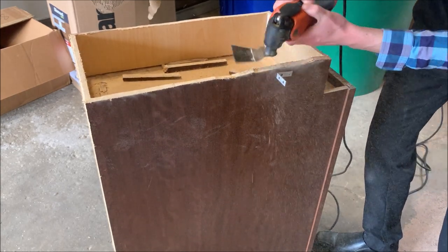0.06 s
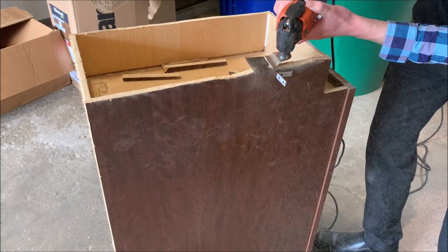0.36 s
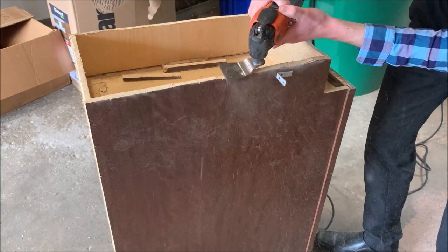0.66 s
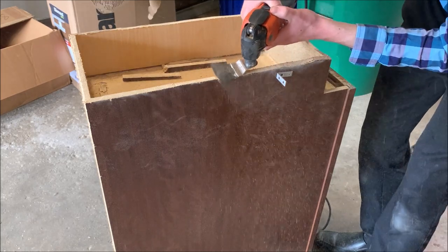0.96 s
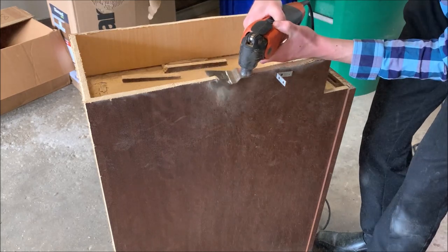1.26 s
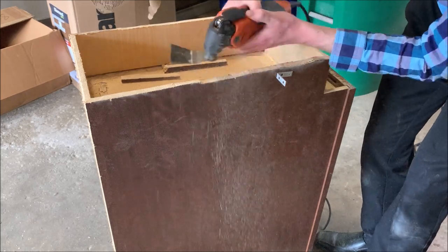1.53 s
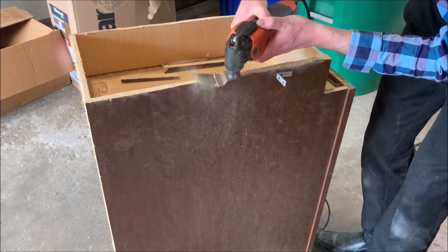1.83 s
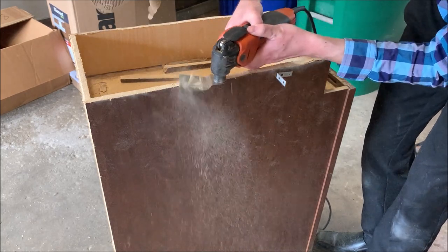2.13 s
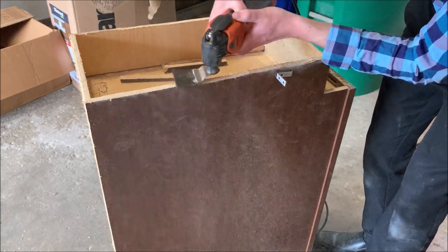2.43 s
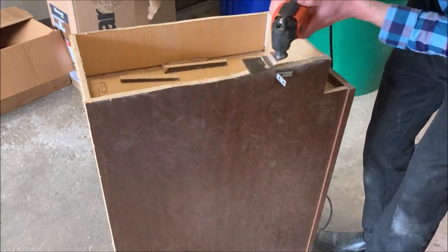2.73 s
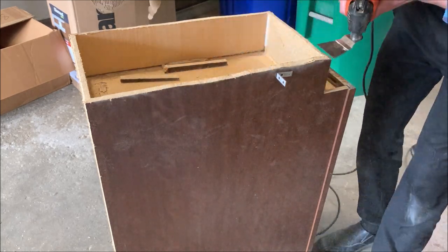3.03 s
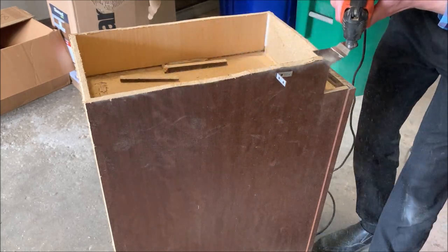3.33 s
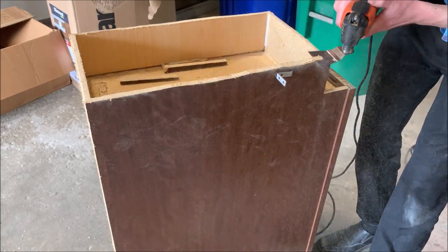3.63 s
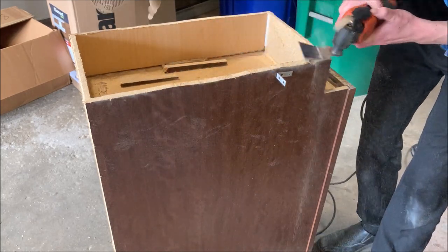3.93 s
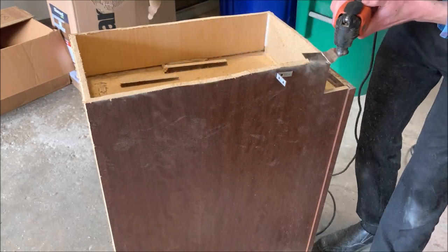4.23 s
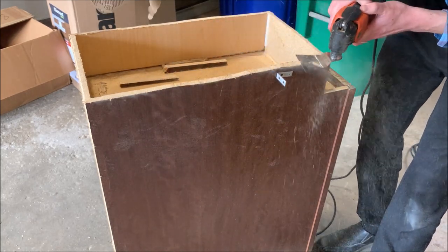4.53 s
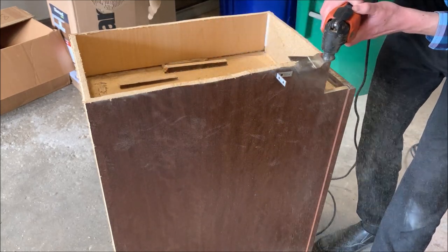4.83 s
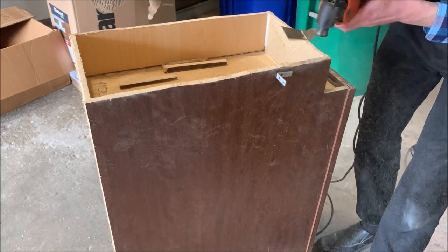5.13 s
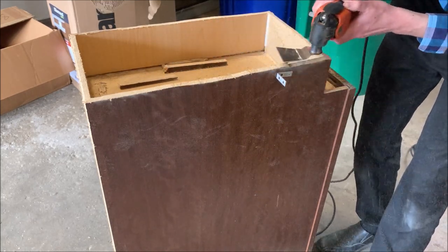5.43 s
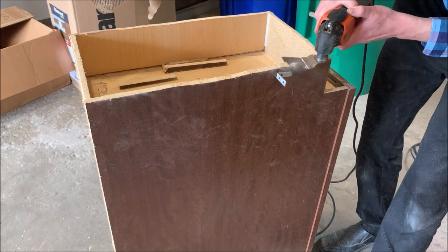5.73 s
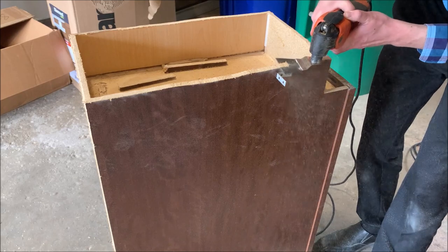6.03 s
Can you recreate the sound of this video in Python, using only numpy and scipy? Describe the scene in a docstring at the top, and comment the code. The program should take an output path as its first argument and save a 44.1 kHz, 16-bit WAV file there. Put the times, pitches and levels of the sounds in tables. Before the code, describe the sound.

An oscillating multi-tool cuts a wooden cabinet edge in short passes, its high whine swelling with a gritty rasp and chatter at each bite.

```python
"""An oscillating multi-tool trims the edge of a wooden cabinet in a garage, in short passes.
It opens in mid-cut, then lifts and whines thinly. At each new bite the motor sags until its governor
catches up, the whine grows loud, the teeth rasp in time with the strokes and the panel drones.
From about 1 s, hard pressure brings bouts of chatter an octave below the whine, and a faint tone sinks
in the background. Two brief touches follow, then mostly longer passes; the last runs on to the end."""
import sys
import numpy as np
from scipy import signal
from scipy.fft import rfft, irfft, next_fast_len
from scipy.io import wavfile

SR = 44100
rng = np.random.default_rng(int(sys.argv[2]) if len(sys.argv) > 2 else 0)


def int16_out(signal):
    """Quantize to a 16-bit WAV file."""
    q = np.round(np.clip(np.atleast_2d(signal).T, -1, 1) * 32767)
    wavfile.write(sys.argv[1], SR, q.astype(np.int16))


N = 272097
TIME = np.arange(N) / SR
TICK_S = .001
TICKS = np.arange(-.5, 6.3, TICK_S)  # clock of the hand's movements, t/s

# Contacts of blade and wood: bite t/s, lift t/s, time to press home t/s, ungoverned drag at bite f/Hz
# and at lift f/Hz, first-touch offset/dB, relative level/dB of hiss, rasp, drone and whine,
# swell of the whine/dB, level/dB of harmonics 2, 3, 4, 5 and 7
PASSES = [(-.5, .08, 0.046, 100.5, 126.5, -8, -29.5, -35, -47, -25.5, -2.5, -28.5, -49, -57, -27, -39),
          (.275, .52, .13, 35.5, 101.5, -7, -30, -42.5, -49.5, -29, 4.5, -35, -41, -39, -33, -49),
          (.5, .64, 0.025, -1.5, 29, -4, -36, -57, -73, -44.5, 1, -50, -61, -58, -63, -50),
          (.62, 1.11, .043, 58.5, 116, 5, -34.5, -44.5, -56, -35, 10.5, -45.5, -45, -47, -47.5, -43),
          (1.07, 1.54, 0.084, 90.5, 118.5, 4.5, -36, -44, -50.5, -29, 4, -39, -38, -66, -38, -37.5),
          (1.69, 2.2, 0.1, 77, 108.5, -9, -32, -40, -42.5, -24, -3, -33.5, -38, -41.5, -41, -41),
          (2.378, 2.545, 0.094, 73.5, 65.5, -0.5, -35.5, -51, -71, -31.5, -20.5, -32, -40, -38, -49, -46),
          (2.77, 2.875, 0.047, 79, 42.5, 5.5, -38, -53.5, -68, -33.5, -9, -39.5, -49, -34, -43, -53),
          (3.143, 3.99, 0.22, 65.5, 113, -2, -31, -42, -46, -26, 2.5, -37.5, -40.5, -44, -32.5, -31),
          (4.167, 4.57, .095, 63.5, 102.5, -5.5, -28, -39.5, -43, -27, 1, -31.5, -35.5, -39.5, -28.5, -30),
          (4.53, 5.145, 0.037, 75, 82.5, -7, -30.5, -38.5, -45.5, -31, 0.5, -34, -37.5, -44.5, -32.5, -45),
          (5.335, 5.365, 0.015, 13.5, -8, 8.5, -36, -58, -79, -49, 4, -45.5, -59, -46, -57, -58),
          (5.399, 5.465, 0.011, 68.5, 21, 16, -32.5, -48.5, -62, -35, -15, -38, -46, -44, -44, -60),
          (5.571, 6.3, 0.13, 65.5, 89.5, -3.5, -30, -40, -36, -26, -3, -28.5, -32.5, -39, -33.5, -40)]


def from_db(db):
    """Amplitude ratio: a factor of ten for every 20 dB."""
    return 10 ** (np.asarray(db) / 20)


def at_hz(points, hz):
    """Interpolation of a spectrum on a logarithmic frequency axis."""
    f, value = np.transpose(points)
    return np.interp(np.log(hz + 1e-9), np.log(f), value)


def columns(rows):
    """The columns of an event table, one row per event, to broadcast against the clock."""
    return np.transpose(rows)[:, :, None]


def strongest(curves):
    return np.interp(TIME, TICKS, np.max(curves, axis=0))


def drift(rate_hz):
    """Random fluctuation of unit rms: noise through a two-pole low-pass."""
    hop = 40
    pole = np.exp(-2 * np.pi * rate_hz * hop / SR)
    slow = signal.lfilter([1], [1, -2 * pole, pole ** 2], rng.standard_normal(N // hop + 2002))[2000:]
    slow /= np.sqrt(np.mean(slow ** 2) + 1e-20)
    return np.interp(np.arange(N) / hop, np.arange(len(slow)), slow)


def white(gate=1):
    """Two uncorrelated white noises, amplitude-modulated by a gate."""
    return rng.standard_normal((2, N)) * gate


def colour(spectrum, source):
    """Spectral shaping to a mid signal of unit rms; coherence between the sides falls with frequency."""
    # Left-right likeness: f/Hz, coherence/1
    likeness = [(400, 0.87), (1200, 0.33), (3000, 0.23), (12000, 0.037)]
    size = next_fast_len(N)
    hz = np.arange(size // 2 + 1) * SR / size
    mid, side = rfft(source, size) * from_db(at_hz(spectrum, hz))
    alike = np.clip(at_hz(likeness, hz), 0, 1)
    pair = irfft(mid * np.sqrt(1 + alike) + side * np.sqrt(1 - alike) * [[1], [-1]], size)[:, :N]
    return pair / np.std(pair.mean(axis=0))


def partial(phase, multiple, waver_db):
    """A wavering sinusoid of rms near 1; the interchannel phase wanders more for higher multiples."""
    apart = np.minimum(.28 * multiple ** .7, .8) * drift(2.5)
    swell = from_db(waver_db * drift(17) - waver_db ** 2 / 10)
    angles = (multiple * phase + rng.uniform(0, 2 * np.pi)) % (2 * np.pi) + apart * [[1], [-1]]
    return np.sqrt(2) * swell * np.cos(angles.astype(np.float32))


def room_tone():
    """Stationary background noise, mostly of low frequency."""
    # Ambient spectrum of the garage: f/Hz, relative level/dB
    ambient_spectrum = [(30, -16), (110, -18), (200, 6), (400, -1.5), (600, 6), (850, -35), (2000, -17.5)]
    return from_db(-69) * colour(ambient_spectrum, white())


def falling_tone():
    """A faint glide, right of centre: phase is the integral of a sinking frequency."""
    # Course of the glide: t/s, nominal f/Hz, level/dB
    glide = [(1.3, 414, -78.5), (1.62, 408, -69), (2.25, 377, -63), (2.95, 357, -60.5), (3.12, 338, -62.5),
             (3.3, 332, -63), (3.5, 325, -93)]
    s, *curves = np.transpose(glide)
    hz, level_db = [np.interp(TIME, s, curve) for curve in curves]
    phase = 2 * np.pi * np.cumsum(hz) / SR
    return from_db(level_db + np.array([[-4], [3]])) * partial(phase, .99, waver_db=3.5)


def garage(x, t60_s=.17, wet_db=-13):
    """Reverberation: diffuse reflections from floor, walls and boxes decay exponentially."""
    t = TIME[:SR // 2]
    tail = rng.standard_normal((2, len(t))) * from_db(-60 * t / t60_s) * (t > .004)
    tail /= np.sqrt(np.sum(tail ** 2, axis=1, keepdims=True))
    return x + from_db(wet_db) * signal.fftconvolve(x, tail, axes=1)[:, :N]


def drive(phase, whine_hz, gear_play_rad=.019):
    """Forced vibration: motor and gear harmonics excite the housing's resonances, over the fan's rush."""
    # Response of the housing: f/Hz, level/dB of a harmonic that falls there
    housing = [(1180, -61.5), (2380, -57.5), (2470, -50.5), (3500, -56.5), (4800, -57), (7150, -57.5),
               (7380, -46), (7700, -64), (10800, -57), (11900, -54), (15500, -62)]
    # Noise of the cooling fan: f/Hz, relative level/dB
    fan_spectrum = [(100, -51), (900, -11), (2000, -10.5), (2700, -7), (3200, 1), (5500, 1), (15500, -26)]
    gear_phase = phase + gear_play_rad * drift(90)
    lines = sum(from_db(at_hz(housing, k * whine_hz)) * partial(gear_phase, k, waver_db=2.4)
                for k in range(1, 14))
    return lines + from_db(-59) * colour(fan_spectrum, white())


def grip(ease_s=.2):
    """Contact ramps of each pass, from 0 to 1: how far along, pressed home and eased off it is."""
    bite, lift, press_s = columns(PASSES)[:3]
    elapsed = TICKS - bite
    return np.clip([elapsed / (lift - bite), elapsed / press_s, 1 - (lift - TICKS) / ease_s], 0, 1)


def motor_hz(set_hz=1167, inertia_s=.033, governor_s=.233):
    """Feedback control: load slows the motor, the governor makes up the loss, release overshoots."""
    _, lift, _, first_hz, last_hz = columns(PASSES)[:5]
    along, pressed, eased = grip()
    load = pressed * (1 - .25 * eased) * (TICKS < lift)
    drag = np.max((first_hz + (last_hz - first_hz) * along) * load, axis=0)
    inertia, governor = np.exp(-TICK_S / inertia_s), np.exp(-TICK_S / governor_s)
    lagged_drag = signal.lfilter([1 - inertia], [1, -inertia], drag)
    sag = signal.lfilter([1, -1], [1, -governor], lagged_drag)
    return set_hz - np.interp(TIME, TICKS, sag)


def pass_level(level_db, soft_db, catch_s, fall_db_per_s, swell_db=0):
    """Envelope in dB: attack at the bite, sustain under pressure, exponential decay after the lift."""
    bite, lift, _, _, _, touch_db = columns(PASSES)[:6]
    along, pressed, eased = grip()
    held = level_db + (touch_db - soft_db) * (1 - pressed) + swell_db * (along - .5) - 2.5 * eased ** 2
    attack = 20 * np.maximum(1 - (TICKS - bite) / catch_s, 0)
    decay = fall_db_per_s * np.maximum(TICKS - lift, 0)
    return strongest(held - attack - decay)


def snags():
    """Transients: a snag or slip in the grain adds a Gaussian bump or dip to three levels in dB."""
    # Snags and slips: t/s, half length t/s, change of level/dB in hiss, rasp and whine
    events = [(.365, 0.022, 1.5, -1, 5.5), (.58, .025, 3, 3, 0), (.66, 0.027, 0.5, -1, 4),
              (.77, 0.034, -1.5, 1, 0.5), (1.0, 0.034, 7, 1.5, 1), (1.1, 0.014, -1, -4, 3.5),
              (1.34, .015, 3, 9.5, 0), (1.8, .012, -1, 3, -4), (1.848, 0.017, -0.5, -5, -15),
              (1.98, 0.049, 2, 0.5, -1), (2.49, 0.022, 3.5, 4, 5.5), (2.85, 0.019, 8.5, 8, -2),
              (3.21, 0.0072, -12, 12.5, 6), (3.39, 0.015, -1.5, -3, 5.5), (3.98, 0.016, 3.5, 12, 2),
              (4.44, 0.013, -1, 1.5, 1.5), (5.425, 0.02, -3, 11.5, 1), (5.74, 0.014, 2, 13, 0)]
    s, width_s, *extras_db = columns(events)
    bump = np.exp(-((TICKS - s) / width_s) ** 2)
    return [np.interp(TIME, TICKS, np.sum(db * bump, axis=0)) for db in extras_db]


def ring_level(multiple, edge_db_per_s=350):
    """Resonance: at some angles the blade locks on to this overtone; gives its level in dB."""
    # Spells of ringing: start t/s, end t/s, multiple of the whine, level/dB
    rings = [(-.1, .065, 2.5, -29), (.33, .43, 5, -38.5), (0.922, 1.49, 3, -32.5), (1.763, 2.14, 3, -30),
             (2.395, 2.45, 4, -45), (2.45, 2.515, 5, -32), (2.78, 2.87, 4, -41), (3.25, 3.42, 3, -35),
             (3.275, 3.6, 5, -28), (3.358, 3.977, 2.5, -29), (3.58, 3.983, 2, -31), (3.7, 3.98, 5, -30.5),
             (4.42, 4.56, 5, -23), (4.62, 4.9, 3, -30.5), (5.03, 5.13, 2, -30), (5.7, 5.9, 2.5, -38.5),
             (5.922, 6.3, 2, -28)]
    start, end, multiples, db = columns(rings)
    outside_s = np.maximum(start - TICKS, 0) + np.maximum(TICKS - end, 0)
    return strongest(np.where(multiples == multiple, db - edge_db_per_s * outside_s, -200))


def panel(level_db):
    """Plate resonance: the cabinet panel drones in a narrow band of noise."""
    # Response of the panel: f/Hz, relative level/dB
    response = [(150, -103), (440, -6), (484, 18.5), (525, -7), (618, -1), (660, -59), (1100, -78)]
    return from_db(level_db) * colour(response, white())


def retrace(scrape, phase, shares):
    """Comb filtering: the teeth cross the same fibres, so the scrape recurs on the following strokes."""
    out = scrape.copy()
    for strokes, share in enumerate(shares, start=1):
        earlier = np.interp(phase - 2 * np.pi * strokes, phase, np.arange(N))
        out += share * scrape[:, np.round(earlier).astype(int)] * (earlier > 0)
    return out


def rasp(phase, teeth_db, wood_db):
    """Modulated friction noise: the teeth tear fibres in one burst a stroke, of varying strength."""
    # Hiss of the teeth: f/Hz, relative level/dB
    teeth_spectrum = [(300, -67), (2500, -70.5), (3600, -5), (5700, 0.5), (6600, -1.5), (7700, 2),
                      (12500, 2), (15500, -1.5)]
    # Rasp of the wood: f/Hz, relative level/dB
    wood_spectrum = [(110, -61), (280, -47.5), (380, -6), (690, -4), (850, -18.5), (1100, -2.5),
                     (1420, -6.5), (1750, 1), (2200, -0.5), (2560, -9.5), (2850, 5), (3150, -4),
                     (4100, -1.5), (6500, -20.5), (9000, -19.5)]
    bursts = np.exp(.46 * np.cos(phase)) * from_db(.3 * drift(160))
    catch = from_db(1.9 * drift(35))
    teeth = colour(teeth_spectrum, retrace(white(bursts), phase, shares=(.33, .4)))
    wood = colour(wood_spectrum, retrace(white(bursts), phase, shares=(.42, .27)))
    return catch * (from_db(teeth_db + 2) * teeth + from_db(wood_db + 5.5) * wood)


def chatter(phase, rise_db_per_s=285, fall_db_per_s=558):
    """Period doubling: strong and weak strokes alternate, adding odd multiples of half the whine."""
    # Bouts of hard pressure: start t/s, end t/s, level/dB of order 0.5, order 1.5, higher half orders
    bouts = [(-.1, .08, -39.5, -34.5, -27.5), (1.06, 1.33, -40.5, -44.5, -37),
             (1.34, 1.54, -35, -44, -36.5), (1.8, 2.0, -45.5, -50.5, -38), (2.01, 2.12, -36.5, -47, -27),
             (3.35, 3.55, -70, -40.5, -25.5), (3.55, 3.99, -44.5, -37.5, -27.5),
             (4.27, 4.6, -65, -46.5, -35), (4.63, 5.13, -44, -41, -35), (5.7, 5.95, -47, -38.5, -26),
             (5.95, 6.3, -66, -42, -29)]
    # Higher half orders: multiple of the whine, relative level/dB
    half_orders = [(2.5, -10.5), (3.5, -10), (4.5, -10), (5.5, -14), (7.5, -15), (10.5, -11)]
    start, end, *levels_db = columns(bouts)
    edges = rise_db_per_s * np.maximum(start - TICKS, 0) + fall_db_per_s * np.maximum(TICKS - end, 0)
    sub_db, fifth_db, halves_db = [strongest(db - edges) for db in levels_db]
    unsteady = phase + .1 * drift(50)
    halves = 0
    for k, relative_db in half_orders:
        level_db = np.maximum(halves_db + relative_db, ring_level(k))
        halves += from_db(level_db) * partial(unsteady, k, waver_db=1.8)
    stutter = 1 + .28 * drift(45)
    octave_below = from_db(sub_db) * partial(unsteady, .5, waver_db=.8)
    fifth_above = from_db(fifth_db) * partial(unsteady, 1.5, waver_db=1.8)
    return stutter * (octave_below + fifth_above + halves)


def blade(phase, whine_db, teeth_db, overtones_db, slip_rad=.017):
    """Periodic impacts on the wood form a harmonic series; timing jitter broadens the upper lines."""
    # High harmonics of the cut: multiple of the whine, level/dB relative to teeth_db
    high_orders = [(6, -10), (8, -14.5), (9, -11), (10, -4.5), (11, -4), (12, -7)]
    # A light touch is more hiss than whine: the blade skips and its overtones smear into bands.
    lightness = np.clip((teeth_db - whine_db) / 7, 0, 1) ** 2
    knocks = phase + slip_rad * drift(80) + .14 * lightness * drift(130)
    out = from_db(whine_db + np.array([[-1.4], [1.2]])) * partial(phase, 1, waver_db=.7)
    for k, level_db in zip((2, 3, 4, 5, 7), overtones_db):
        out += from_db(np.maximum(level_db, ring_level(k))) * partial(knocks, k, waver_db=1.8)
    for k, level_db in high_orders:
        out += from_db(teeth_db + level_db) * partial(knocks, k, waver_db=4)
    return out


def cut(phase, skip_db=9.5):
    """Superposition: blade, teeth and panel sound together, each with its own contact envelope."""
    hiss, wood, drone, whine, swell, *overtones = columns(PASSES)[6:]
    snag_hiss_db, snag_wood_db, snag_whine_db = snags()
    along, pressed, _ = grip()
    # Until it is pressed home the blade skips and the whine stutters.
    stutter_db = skip_db * strongest((1 - pressed) * (along > 0)) * np.abs(drift(23))
    teeth_db = pass_level(hiss, soft_db=3, catch_s=.0089, fall_db_per_s=356) + snag_hiss_db
    wood_db = pass_level(wood, soft_db=7, catch_s=.0038, fall_db_per_s=598) + snag_wood_db
    whine_db = pass_level(whine, soft_db=7.5, catch_s=.012, fall_db_per_s=1800, swell_db=swell)
    whine_db += snag_whine_db - stutter_db
    overtones_db = [pass_level(db, soft_db=6.5, catch_s=.0065, fall_db_per_s=620) for db in overtones]
    drone_db = pass_level(drone, soft_db=18, catch_s=.0088, fall_db_per_s=412)
    return (panel(drone_db) + blade(phase, whine_db, teeth_db, overtones_db)
            + chatter(phase) + rasp(phase, teeth_db, wood_db))


def scene(bass_cut_hz=140):
    """Phase locking: one motor times whine, knocks and rasp; so small a source radiates little bass."""
    whine_hz = motor_hz() * (1 + .0012 * drift(14))
    phase = 2 * np.pi * np.cumsum(whine_hz) / SR
    tool = drive(phase, whine_hz) + cut(phase)
    tool = signal.sosfilt(signal.butter(2, bass_cut_hz, "high", fs=SR, output="sos"), tool)
    return falling_tone() + room_tone() + garage(tool)


def record(dry):
    """Band limiting: a steep elliptic low-pass removes the highest treble."""
    cutoff_hz = 15900
    return signal.sosfilt(signal.ellip(12, .1, 90, cutoff_hz, fs=SR, output="sos"), dry)


dry = scene()
out = record(dry)
int16_out(out)
```